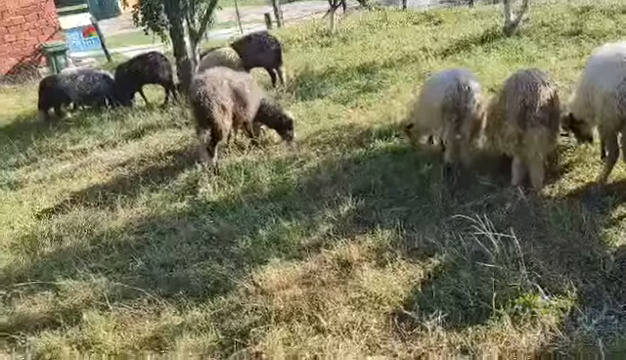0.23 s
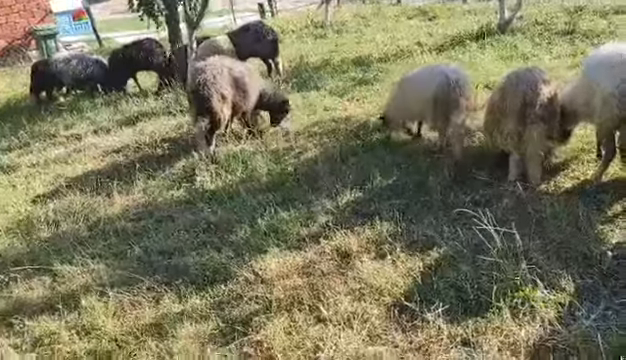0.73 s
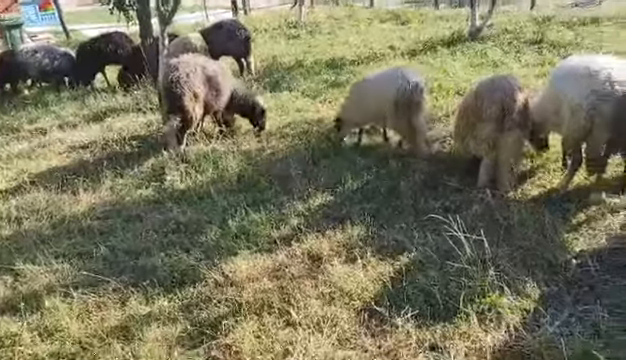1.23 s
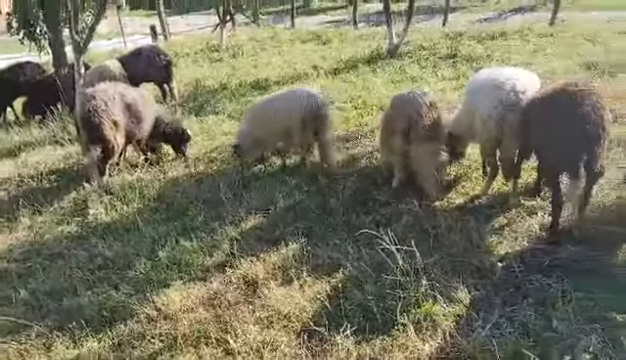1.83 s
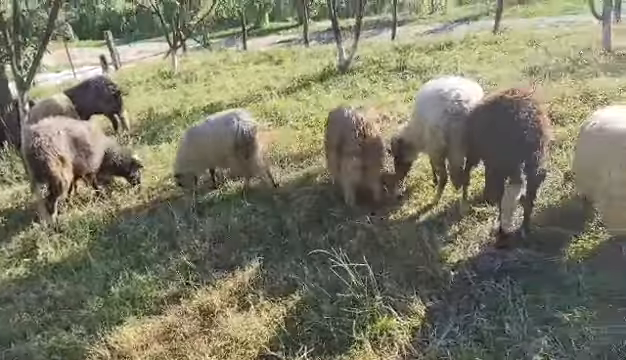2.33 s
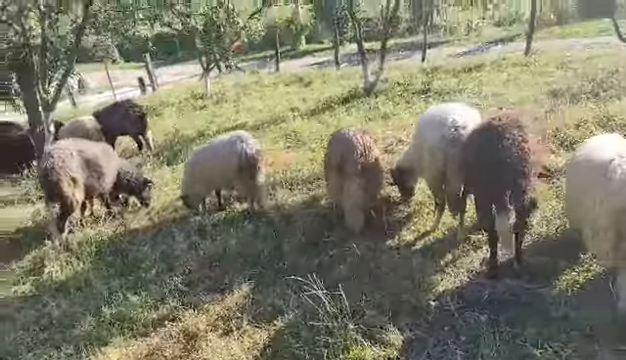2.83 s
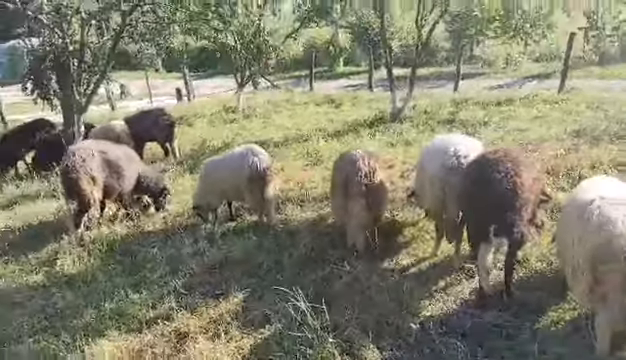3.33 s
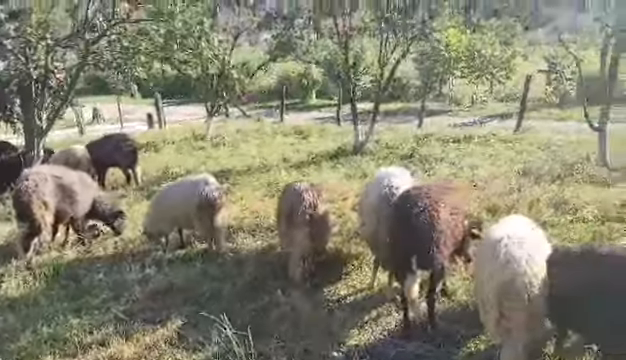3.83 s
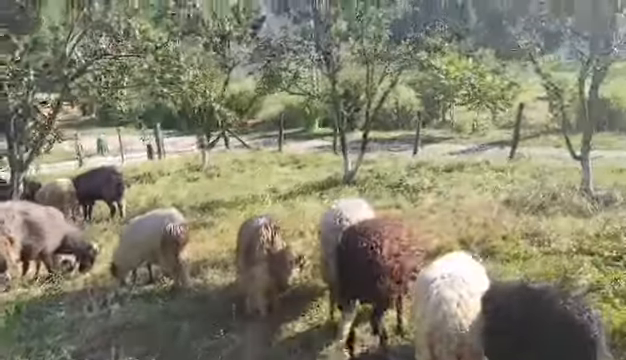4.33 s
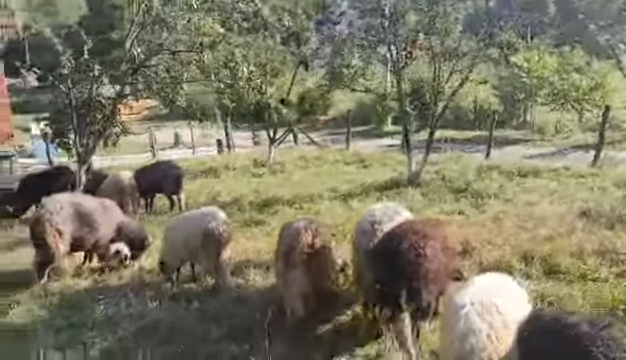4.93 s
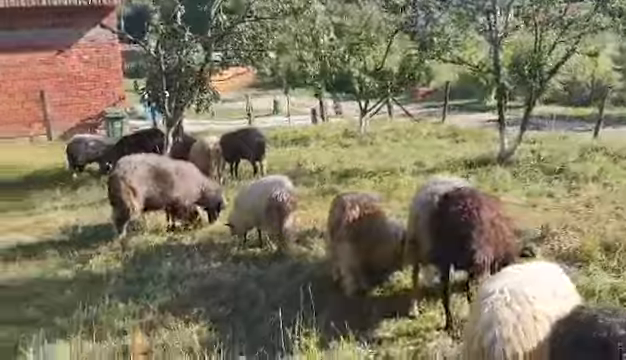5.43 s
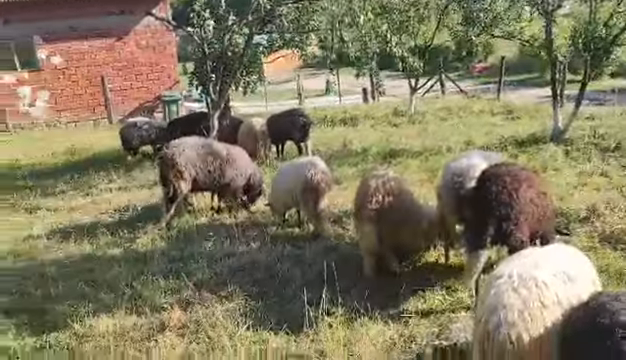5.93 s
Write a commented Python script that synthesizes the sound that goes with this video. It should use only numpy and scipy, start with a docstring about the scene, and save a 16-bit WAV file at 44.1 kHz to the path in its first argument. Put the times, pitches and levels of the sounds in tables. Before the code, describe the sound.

Outdoors in a grassy orchard, one thin metal livestock bell clinks at irregular intervals, faint at first, then stronger and more hollow. Grazing mouths tear and rustle dry grass quietly, and a few stalks snap. Wind bumps softly at first, then rumbles and thumps around three seconds and almost continually after four, heavily on the left of a handheld stereo microphone. Very little echo.

```python
"""Light clinks of one sheet-metal bell, faint at first, over distant air and a dry grass rustle.
The bell is a bank of decaying wall modes with a hollow clonk, a bright jangle and clapper ticks.
Grazing mouths are clumped fibre noise under tug envelopes; snapping stalks are short grainy bursts.
Gusts are lumpy low noise with sinking thumps, nearly all at the left microphone port.
A soft low bump starts a slow heave of pressure, and the meadow scatters bell and stalks faintly."""
import sys
import numpy as np
from scipy import signal
from scipy.io import wavfile
from scipy.ndimage import uniform_filter1d

SR = 44100
rng = np.random.default_rng(int(sys.argv[2]) if len(sys.argv) > 2 else 0)


def unload_wav(signal):
    """Save mono or channel-first audio to the path in sys.argv[1] as 16-bit WAV at rate SR, clipped to [-1, 1]."""
    wavfile.write(
        sys.argv[1],
        SR,
        np.round(np.clip(np.atleast_2d(signal).T, -1, 1) * 32767).astype(np.int16),
    )


N = 272008
TIME = np.arange(N) / SR  # s
START_S, CUTOFF_HZ = 0.069, 13600

# Levels in the tables are relative: each layer adds its own trims.
# spectrum of the distant air: pitch_hz, density_db (per Hz)
AIR_SPECTRUM = [(40, 12), (100, 3), (280, 7.5), (1000, -23.5), (6000, -24)]
# stereo balance of air and grass: pitch_hz, left_minus_right_db
GRASS_BALANCE = [(1200, 3), (2300, 5), (4000, 1), (7300, -15), (9200, 24), (13000, 12)]
# likeness of left and right in air and grass: pitch_hz, likeness (1 = identical)
GRASS_LIKENESS = [(700, 0.64), (1400, 0.26), (3000, 0), (12000, 0.09)]

# how busily the flock feeds: time_s, rustle_db
FEEDING = [(0.2, -62), (0.25, -63), (0.41, -63.5), (2.43, -61.5), (2.76, -58), (3.17, -64.5), (3.56, -54.5),
           (3.89, -61), (4.37, -56.5), (5.28, -55), (6.17, -60)]
# a mouth pulls off a tuft: start_s, length_s, rasp_db, rustle_db
TUGS = [(0.794, 0.14, -73, -60), (1.798, 0.089, -87, -56.5), (2.642, 0.29, -59.5, -65.5),
        (3.352, 0.087, -53, -71), (3.486, 0.036, -62, -44.5), (4.34, 0.18, -81.5, -56),
        (4.873, 0.1, -79, -50.5), (5.615, 0.16, -54, -54.5)]
TUG_ATTACK_S, TUG_RELEASE_S = 0.024, 0.0083
# spectrum of the dull tearing rasp: pitch_hz, density_db (per Hz)
TEAR_SPECTRUM = [(350, 0), (700, 1.5), (1900, 1), (2500, 3.5), (3300, -6), (4800, -64), (8000, -43)]
# spectrum of the crisp dry rustle: pitch_hz, density_db (per Hz)
CRISP_SPECTRUM = [(1500, -39), (3300, -0.5), (4700, 0.5), (7400, 10), (8800, 14.5), (10200, -6.5),
                  (12800, -34), (14000, -37)]

# bell wall modes, in close pairs because the bell is oval:
# pitch_hz, level_db, t60_s, left_minus_right_db, waves_round_rim, wave_phase_deg, left_lead_rad
WALL_MODES = [(1130.0, -9.5, 1.24, 5.5, 2.0, 117, 1.5), (2637.0, 2, 0.54, 9.5, 3.0, 129, 2),
              (2865.0, -1, 0.68, 13, 3.0, 52.5, -2.5), (4912.0, 0, 0.33, -1.5, 4.0, 63, 0),
              (5178.0, 5, 0.26, 0.5, 4.0, 182, -2.0), (7460.0, 9, 0.24, -8, 5.0, 36.5, -0.95),
              (7792.0, 10, 0.18, -1, 5.0, 167.0, 0.5), (8984.0, 10, 0.16, 20, 4.0, 85, -0.1),
              (9334.0, 2, 0.19, 8, 2.0, 110, -1), (9807.0, 3.5, 0.12, 16, 2.0, 175, 1.5),
              (10280, 4, 0.14, 8, 3.0, 55, 4), (10752.0, -7.5, 0.13, 19, 6.0, 220, 5.5),
              (12290.0, -13, 0.23, 7, 5.0, 170, 1), (12630.0, -10, 0.12, 3, 4.0, 51, -2),
              (12829.0, -15, 0.12, 2, 5.0, 144, 4.1)]
# clapper knocks: start_s, strength_db, place_deg (on the rim), hardness_db_per_octave,
# first_singing_hz, second_singing_hz, clonk_db, tick_db
KNOCKS = [(0.07, -62, 87, -6, 9334.0, 1130.0, -66.0, -72), (0.12, -58.5, 9.2, 0, 8984.0, 2865.0, -59, -61),
          (0.3791, -42, 174.0, -1, 7792.0, 10752.0, -40, -33),
          (0.399, -45.5, 24.4, -1.5, 7460.0, 2637.0, -42, -49),
          (0.806, -45.5, 11, -5.5, 7792.0, 8984.0, -54, -35.5),
          (0.833, -47, 99, -8.5, 7792.0, 9807.0, -48, -55.0),
          (0.859, -52, 106, 2, 2637.0, 5178.0, -48, -61.0),
          (1.257, -47, 57.4, -0.5, 2637.0, 5178.0, -47, -36),
          (1.572, -51, 46, 2.5, 2637.0, 9334.0, -50.5, -37.5),
          (1.709, -52.5, 90, 4.5, 2637.0, 7792.0, -46.5, -60.0),
          (1.9389, -45, 9.6, 1.5, 8984.0, 12829.0, -37.5, -33.0),
          (2.0146, -40.0, 36, -2, 9334.0, 2637.0, -37, -25.5),
          (2.086, -47, 175.0, 4.5, 2865.0, 12630.0, -35.0, -39),
          (2.467, -43, 127, -2.5, 2637.0, 1130.0, -52.0, -34.0),
          (2.532, -59, 47.0, 3, 2637.0, 9334.0, -41.5, -57.0),
          (3.325, -47, 43, -1.5, 9334.0, 5178.0, -38.5, -36),
          (3.413, -44.0, 92, 4, 7460.0, 5178.0, -36, -37.0),
          (3.481, -41, 1.0, 0.5, 12829.0, 2865.0, -31.5, -48.0),
          (3.627, -44.0, 131.0, -1.5, 7792.0, 2865.0, -35.5, -52.5),
          (3.8069, -51.5, 99, -0.5, 10752.0, 7792.0, -35, -47.0),
          (3.831, -49.0, 102, 0.5, 10752.0, 12630.0, -37.5, -60.0),
          (4.115, -43.5, 14.5, 3, 12290.0, 1130.0, -27.5, -39),
          (4.215, -43.5, 156.0, -2.5, 7460.0, 1130.0, -44, -43),
          (4.3304, -42.5, 144.0, -3.5, 7792.0, 7460.0, -31, -52.0),
          (4.585, -50, 139.0, 3.5, 12829.0, 7792.0, -36, -37.5),
          (4.823, -46.5, 158.0, -1, 7460.0, 2637.0, -29, -52),
          (5.171, -51, 112.0, -6.5, 8984.0, 7460.0, -35.5, -49),
          (5.49, -44, 184, 2, 2637.0, 7460.0, -23, -47), (5.508, -48.5, 69, 8, 10752.0, 9334.0, -33, -52.0),
          (5.794, -36.5, 181, -2.5, 1130.0, 4912.0, -22, -39),
          (5.804, -40, 98, 5.5, 12829.0, 2637.0, -60.0, -37.0),
          (6.027, -39, 178.0, 0.5, 9807.0, 1130.0, -29.5, -31.5)]
# hollow clonk, a main mode and two of opposite sign that make it swell and beat: pitch_hz, level_db, t60_s
CLONK_MODES = [(1011.4, 4.5, 0.13), (1042, -8.5, 0.27), (1040, 1.5, 0.026)]
# the clapper's own ring: pitch_hz, level_db, t60_s
CLAPPER_MODES = [(2460, -12, 0.016), (3400, -14, 0.047)]
NODE_LEAK = 0.019  # energy coupling left when a mode is hit on a node
PIVOT_HZ = 5260  # hardness tilts the modes about this pitch
SING_DB = (13, 9)  # lift of the first and second singing partial
CHATTER_S, CHATTER_PER_S, CHATTER_RAD = 0.009, 450, 0.83  # decay, speed, phase shake at PIVOT_HZ

# gusts: start_s, length_s, eddy_db
GUSTS = [(.18, 0.43, -60.5), (.6, 0.21, -55), (1.27, 0.21, -61), (2.21, 0.5, -55), (2.61, 0.36, -41.5),
         (3.14, 0.31, -53.5), (3.71, 0.62, -41.5), (3.92, .16, -33), (4.12, 0.12, -30.5),
         (4.34, 0.082, -36.5), (4.51, 0.025, -45.5), (4.95, 0.38, -31), (5.5, 0.041, -30.5),
         (5.6, 0.072, -32.5)]
GUST_ATTACK_S, GUST_RELEASE_S, CALM_DB = 0.022, 0.062, -86
# the slow swell follows a share of the eddies' dB swing about a typical gust, and dies away later
SWELL_FOLLOWS, TYPICAL_GUST_DB, SWELL_RELEASE_S = 0.52, -26, 0.097
# spectrum of the slow pressure swell: pitch_hz, density_db (per Hz)
SWELL_SPECTRUM = [(15, 4.5), (35, 0.5), (70, -1), (110, -13), (200, -35)]
# spectrum of the eddies: pitch_hz, density_db (per Hz)
EDDY_SPECTRUM = [(50, -0.5), (100, 0), (170, 2), (280, -9.5), (400, -18), (600, -42.5), (1000, -35)]
# stereo balance of the wind: pitch_hz, left_minus_right_db
WIND_BALANCE = [(30, 14), (80, 25), (160, 70), (600, 10)]
# likeness of left and right in the wind: pitch_hz, likeness (1 = identical)
WIND_LIKENESS = [(30, 0.033), (600, 0.013)]
# single eddies that thump the port: peak_s, peak_db, pitch_hz (at the peak)
THUMPS = [(0.677, -37, 133), (2.695, -27.5, 247), (2.754, -25, 149), (2.875, -26, 156), (2.905, -21.5, 228),
          (2.929, -21.5, 153), (3.193, -24.5, 136), (3.324, -28, 151), (3.79, -24.5, 231),
          (3.866, -20, 192), (3.963, -18, 260), (4.187, -21, 239), (4.355, -26.5, 228), (5.029, -21.5, 210),
          (5.155, -17, 168), (5.363, -23, 214), (5.381, -20.5, 291), (5.489, -22, 256), (5.599, -18, 282),
          (5.61, -15.5, 101), (5.678, -19.5, 165), (5.703, -25.5, 279)]
# stalks that snap: start_s, woody_db, crisp_db
SNAPS = [(.76, -47, -64), (0.973, -45.5, -56), (1.0794, -40.5, -48), (1.096, -46.5, -37), (1.103, -46, -44),
         (1.8728, -48.5, -46), (3.011, -52, -49), (3.509, -39.5, -43), (3.5233, -29, -39),
         (3.542, -38.5, -42), (5.463, -56, -41)]


def from_db(db):
    """Decibels to amplitude gain."""
    return 10 ** (np.asarray(db) / 20)


def rms_one(x):
    """Scale to unit power."""
    return x / np.sqrt(np.mean(x ** 2) + 1e-20)


def at_hz(points, hz):
    """Read a curve on a log-frequency axis."""
    points = np.array(points)
    return np.interp(np.log(hz), np.log(points[:, 0]), points[:, 1])


def band(x, low_hz, high_hz, order=2):
    """Causal band-pass."""
    sos = signal.butter(order, [low_hz, min(high_hz, 0.45 * SR)], "band", fs=SR, output="sos")
    return signal.sosfilt(sos, x + 1e-18)


def panned(side_db):
    """Left and right gains of unit mean power."""
    return rms_one(from_db([[side_db / 2], [-side_db / 2]]))


def drift(rate):
    """Smooth random wander of unit power with rate new targets a second."""
    knots = rng.standard_normal(2048)
    return rms_one(np.interp(TIME * rate, np.arange(len(knots)), knots))


def clicks(times, heights):
    """One-sample impulses."""
    out = np.zeros(N)
    places = np.round(np.asarray(times) * SR).astype(int)
    np.add.at(out, np.clip(places, 0, N - 1), heights)
    return out


def fading(times, level_db, t60):
    """Amplitude of something that gains energy at each blow and loses it steadily."""
    blows = clicks(times, from_db(level_db) ** 2)
    kept = from_db(-120 / (t60 * SR))  # energy kept per sample
    return np.sqrt(signal.lfilter([1], [1, -kept], blows + 1e-24))


def ring(x, hz, t60):
    """Two-pole resonator: a unit click sets a decaying sine of height 1 ringing."""
    radius = from_db(-60 / (t60 * SR))
    turn = 2 * np.pi * hz / SR
    return signal.lfilter([0, np.sin(turn)], [1, -2 * radius * np.cos(turn), radius ** 2], x + 1e-18)


def swells(events, attack_s, release_s):
    """Amplitude from the summed power of events (start, length, dB) that rise, hold and die away."""
    power = 0
    for start, length, level_db in events:
        rise = np.clip((TIME - start) / attack_s, 0, 1)
        fall = np.exp(-np.clip((TIME - start - length) / release_s, 0, 20))
        power = power + (from_db(level_db) * rise * fall) ** 2
    return np.sqrt(power)


def coloured(draw, spectrum, balance, likeness, span):
    """Shape draw() in third-octave stereo bands; their left-right mean has unit power inside span (Hz)."""
    out, sources = 0, [draw(), draw()]
    for k, hz in enumerate(20 * 2 ** (np.arange(29) / 3)):
        if not spectrum[0][0] / 2 < hz < spectrum[-1][0] * 2:
            continue
        mid, wide = band(sources[k % 2], hz / 2 ** (1 / 6), hz * 2 ** (1 / 6))
        alike = np.clip(at_hz(likeness, hz), -1, 1)
        opposite = wide * np.array([[1], [-1]])
        pair = np.sqrt(1 + alike) * mid + np.sqrt(1 - alike) * opposite
        out = out + from_db(at_hz(spectrum, hz)) * panned(at_hz(balance, hz)) * pair
    return out / band(out.mean(axis=0), *span, order=4).std()


def white():
    """Two unrelated noises."""
    return rng.standard_normal((2, N))


def distant_air(level_db=-66):
    """Steady low-heavy noise of far-off air."""
    return from_db(level_db) * coloured(white, AIR_SPECTRUM, GRASS_BALANCE, GRASS_LIKENESS, (200, 800))


def fibres(per_s=2600, size_db=1.0, clump_db=6.5, brush=0.51):
    """Clumps of tiny fibre breaks over the smooth brushing of blades."""
    sizes = from_db(size_db * np.minimum(rng.exponential(1, N), 4))
    density = per_s * from_db(clump_db * drift(70))
    breaks = rng.random(N) < density / SR
    return rms_one(white() * sizes * breaks) + brush * white()


def crackles(per_s=22, size_db=4, t60=0.065):
    """Unit-power envelope: now and then a thicker blade parts with a brief jump that dies away."""
    draws = rng.random((400, 2))
    times = np.cumsum(-np.log(draws[:, 0])) / per_s
    sizes_db = size_db * np.minimum(-np.log(draws[:, 1]), 3)
    inside = times < TIME[-1]
    return rms_one(fading(times[inside], sizes_db[inside], t60))


def grass(tear_db=-1.0, crisp_db=0, uneven_db=2.0, crackle=0.35):
    """Tufts tear with a dull rasp and dry blades rustle; single tugs join the flock's uneven feeding."""
    feed_s, feed_db = np.transpose(FEEDING)
    busy_db = np.interp(TIME, feed_s, feed_db) + uneven_db * drift(15)
    grain = np.hypot(1, crackle * crackles())
    starts, lengths, rasp_db, rustle_db = np.transpose(TUGS)
    rasp = swells(zip(starts, lengths, rasp_db), TUG_ATTACK_S, TUG_RELEASE_S)
    rustle = swells(zip(starts, lengths, rustle_db), TUG_ATTACK_S, TUG_RELEASE_S)
    tear = coloured(fibres, TEAR_SPECTRUM, GRASS_BALANCE, GRASS_LIKENESS, (1350, 2300))
    crisp = coloured(fibres, CRISP_SPECTRUM, GRASS_BALANCE, GRASS_LIKENESS, (5600, 7000))
    tear_level = np.hypot(from_db(busy_db + tear_db) * grain, rasp)
    crisp_level = np.hypot(from_db(busy_db + crisp_db) * np.sqrt(grain), rustle)
    return tear_level * tear + crisp_level * crisp


def chatter(times):
    """The clapper buzzes on the wall just after each knock: 1 at the knock, then dying away."""
    latest = times[np.maximum(np.searchsorted(times, TIME) - 1, 0)]
    return np.exp(-np.clip((TIME - latest) / CHATTER_S, 0, 20))


def wall_modes(times, strength_db, place, hardness, sing_hz, waver_db=2, sway=0.85):
    """Decaying partials of the bell wall; a mode wakes most when hit on a crest of its wave."""
    mode_hz = np.array(WALL_MODES)[:, :1]
    singing = np.array([np.abs(mode_hz - hz).argmin(axis=0) for hz in sing_hz])
    out, buzz = np.zeros((2, N)), chatter(times)
    for mode, (hz, level_db, t60, side_db, waves, offset, lead) in enumerate(WALL_MODES):
        coupling = NODE_LEAK + np.cos(np.radians(waves * place - offset)) ** 2
        lift_db = (np.array(SING_DB) * (singing == mode).T).max(axis=1)
        colour_db = hardness * np.log2(hz / PIVOT_HZ) + 10 * np.log10(coupling) + lift_db
        # a 24-sample average softens each onset
        height = uniform_filter1d(fading(times, strength_db + colour_db + level_db, t60), size=24)
        pitch_scale = np.sqrt(hz / PIVOT_HZ)
        shake = CHATTER_RAD * buzz * pitch_scale * drift(CHATTER_PER_S)
        # the swinging bell turns its lobes, so each port hears a wandering level and phase
        for channel in range(2):
            phase = 2 * np.pi * hz * TIME + shake - channel * lead + sway * pitch_scale * drift(9)
            waver = from_db(waver_db * drift(25))
            out[channel] += panned(side_db)[channel] * height * waver * np.sin(phase)
    return out


def clonks(times, level_db, detune=0.0072, rough=0.21, side_db=5):
    """The hollow note of the bell, a little off pitch at each knock and slightly rattling."""
    mono = 0
    stretches = 1 + detune * rng.standard_normal(len(times))
    for start, height, stretch in zip(times, from_db(level_db), stretches):
        blow = clicks([start], [height])
        first, *others = (from_db(db) * ring(blow, hz * stretch, t60) for hz, db, t60 in CLONK_MODES)
        mono = mono + first - sum(others)
    mono = mono * (1 + rough * drift(220))
    late = np.interp(TIME - 0.00015, TIME, mono)  # reaches the right port later
    return panned(side_db) * np.array([mono, late])


def clank(times, level_db, body_db=3, hard_db=-28, steepness=1.0, crack_db=4, crack_t60=0.0074, side_db=4.5):
    """A knock cracks across the treble and rings the clapper, out of proportion when the tick is hard."""
    crack = fading(times, level_db + crack_db, crack_t60) * band(white(), 1400, 6200, order=1)
    blows = clicks(times, from_db(level_db + body_db + steepness * (level_db - hard_db)))
    body = sum(from_db(db) * ring(blows, hz, t60) for hz, db, t60 in CLAPPER_MODES)
    return (crack + body) * panned(side_db)


def jangle(times, strength_db, hardness, level_db=-15, t60=0.036, uneven_db=5.5,
           low_hz=7000, high_hz=13000, side_db=5, count=22):
    """Seams and rivets add many short bright partials, in a new mixture at each knock."""
    out = np.zeros((2, N))
    centre_hz = np.sqrt(low_hz * high_hz)
    for hz in np.linspace(low_hz, high_hz, count) + rng.uniform(-100, 100, count):
        colour_db = hardness * np.log2(hz / centre_hz) + uneven_db * rng.standard_normal(len(times))
        for channel in range(2):
            heights = from_db(strength_db + level_db + colour_db) * rng.choice([-1, 1], len(times))
            scattered = times + rng.uniform(0, 0.001, len(times))
            out[channel] += ring(clicks(scattered, heights), hz, t60)
    return out * panned(side_db)


def bell():
    """Each clapper knock excites wall modes, hollow clonk, clapper tick and jangle together."""
    times, strength_db, place, hardness, *sing_hz, clonk_db, tick_db = np.transpose(KNOCKS)
    wall = wall_modes(times, strength_db, place, hardness, sing_hz)
    return wall + clonks(times, clonk_db) + clank(times, tick_db) + jangle(times, strength_db, hardness)


def meadow(x, echo_db=-24, t60=0.46):
    """Faint scatter from trunks and a brick wall: decaying noise as an impulse response."""
    t = TIME[:SR // 2]
    noise = band(rng.standard_normal((2, len(t))), 510, 6200)
    scatter = noise * from_db(-60 * t / t60) * (t > 0.012)
    scatter /= np.sqrt(np.sum(scatter ** 2) / 2)
    return x + from_db(echo_db) * signal.fftconvolve(x, scatter, axes=1)[:, :N]


def gustiness_db(release_s):
    """Level of the airflow: gusts over a calm."""
    return 20 * np.log10(np.hypot(from_db(CALM_DB), swells(GUSTS, GUST_ATTACK_S, release_s)))


def wind(swell_db=-33, lumpy_db=4.5):
    """Slow pressure swell and lumpy turbulence, nearly all at the windward left port."""
    fast_db = gustiness_db(GUST_RELEASE_S)
    slow_db = SWELL_FOLLOWS * (gustiness_db(SWELL_RELEASE_S) - TYPICAL_GUST_DB)
    swell = coloured(white, SWELL_SPECTRUM, WIND_BALANCE, WIND_LIKENESS, (25, 90))
    eddies = coloured(white, EDDY_SPECTRUM, WIND_BALANCE, WIND_LIKENESS, (100, 450))
    lumps = rms_one(from_db(lumpy_db * drift(55)))
    return from_db(slow_db + swell_db) * swell + from_db(fast_db) * lumps * eddies


def bump_and_heave(at_s=0.19, bump_db=-39, bump_hz=85, bump_t60=0.036,
                   heave_db=-25, heave_hz=2.46, heave_t60=1.0):
    """One push rings a soft low bump and a slow heave of pressure."""
    push = clicks([at_s], [1])
    bump = from_db(bump_db) * ring(push, bump_hz, bump_t60)
    heave = from_db(heave_db) * ring(push, heave_hz, heave_t60)
    return (bump + heave) * panned(4.4)


def thumps(level_db=2, swell_s=0.00609, glide_per_s=18, rough=1.0):
    """Each eddy thumps the left port: a roughened sine swells quickly and dies as its pitch sinks."""
    out = np.zeros(N)
    t = TIME[:SR // 10]
    for peak_s, peak_db, hz in THUMPS:
        pitch = hz * np.exp(-glide_per_s * (t - swell_s))
        wobble = np.interp(t, np.linspace(0, t[-1], 30), rng.standard_normal(30))
        phase = 2 * np.pi * (np.cumsum(pitch) / SR + rng.random()) + rough * wobble
        envelope = t / swell_s * np.exp(1 - t / swell_s)  # 1 at the peak
        start = int((peak_s - swell_s) * SR)
        out[start:start + len(t)] += from_db(peak_db + level_db) * envelope * np.sin(phase)
    return panned(43) * out


def snaps(woody_trim_db=2.0, crisp_trim_db=4, t60=0.06):
    """A stalk breaks in a short grainy burst, with a woody and a crisp band of fibre noise."""
    times, woody_db, crisp_db = np.transpose(SNAPS)
    woody = fading(times, woody_db + woody_trim_db, t60) * rms_one(band(fibres(), 1300, 4900))
    crisp = fading(times, crisp_db + crisp_trim_db, t60) * rms_one(band(fibres(), 7260, 7970))
    return woody + crisp


def scene():
    """Bell and stalks scatter in the meadow; air, grazing, wind and bump stay direct."""
    scattered = meadow(bell() + snaps())
    return distant_air() + grass() + scattered + wind() + bump_and_heave() + thumps()


def record(dry):
    """The microphone opens over 4 ms after a moment of silence; a steep low-pass cuts the top."""
    opened = np.clip((TIME - START_S) / 0.004, 0, 1)
    top_cut = signal.ellip(10, 0.3, 80, CUTOFF_HZ, fs=SR, output="sos")
    return signal.sosfilt(top_cut, dry * opened)


dry = scene()
out = record(dry)
unload_wav(out)
```